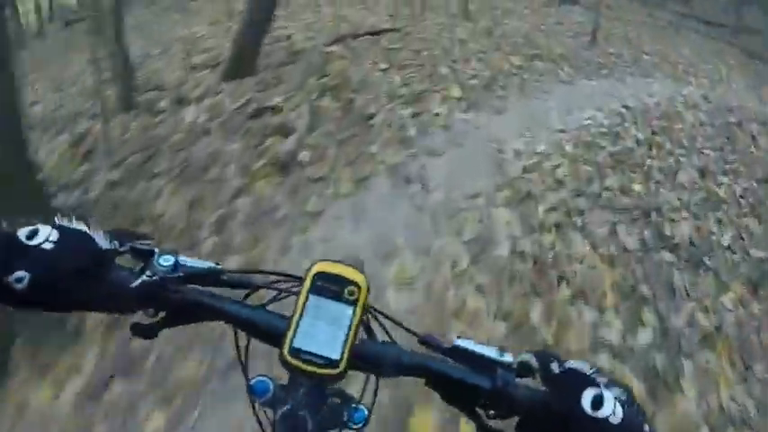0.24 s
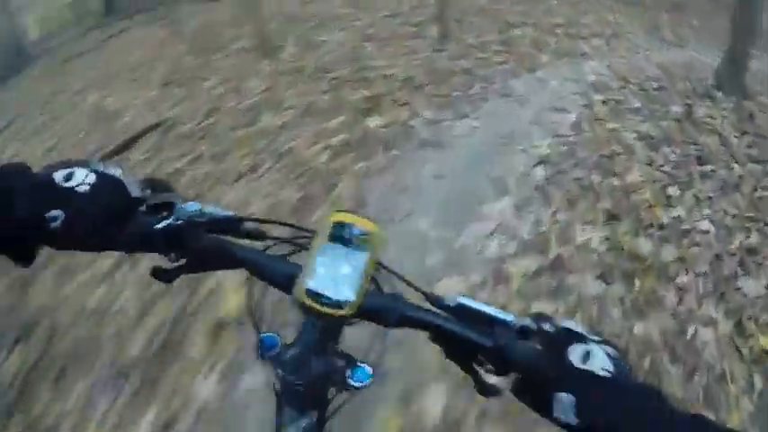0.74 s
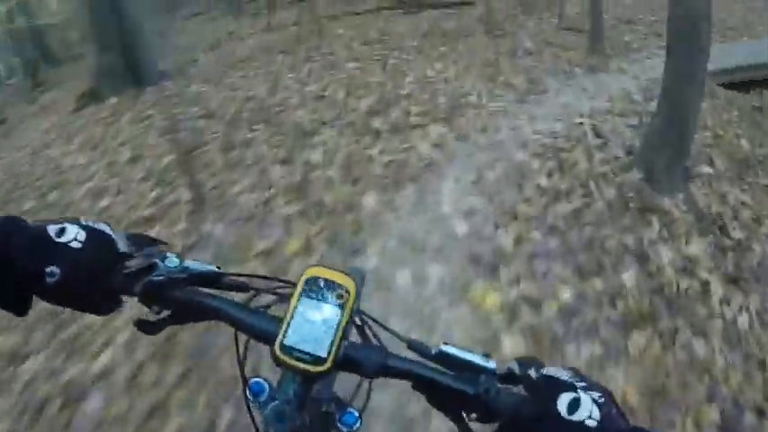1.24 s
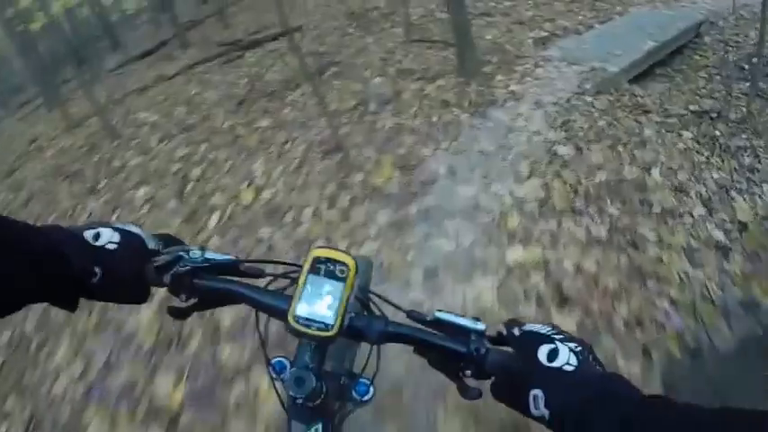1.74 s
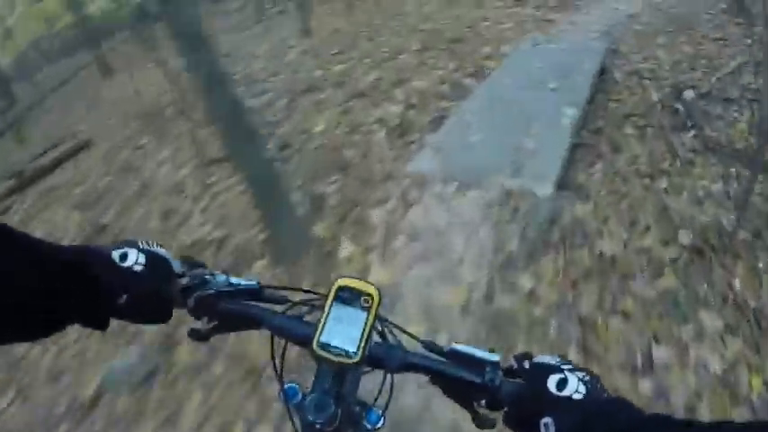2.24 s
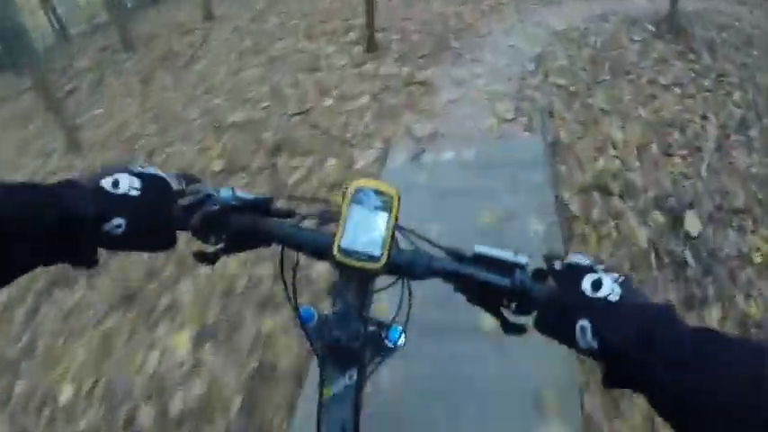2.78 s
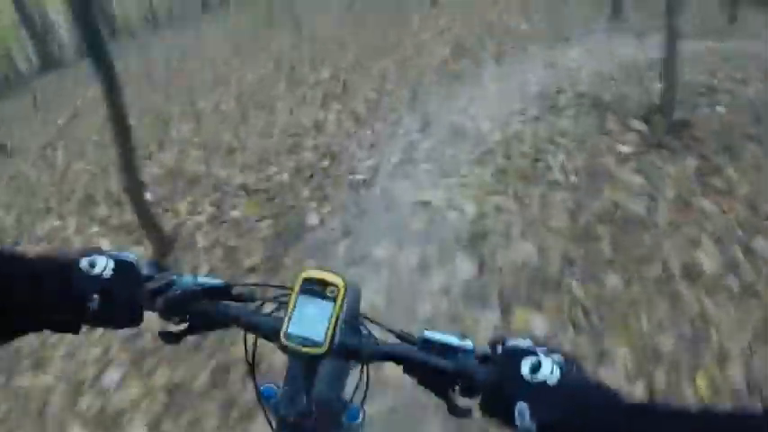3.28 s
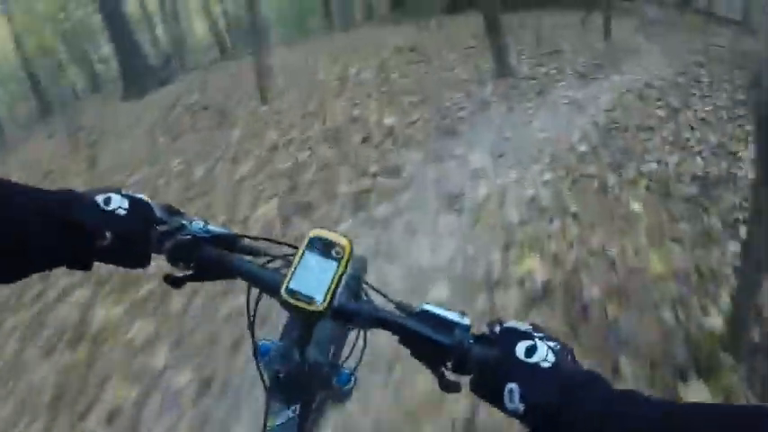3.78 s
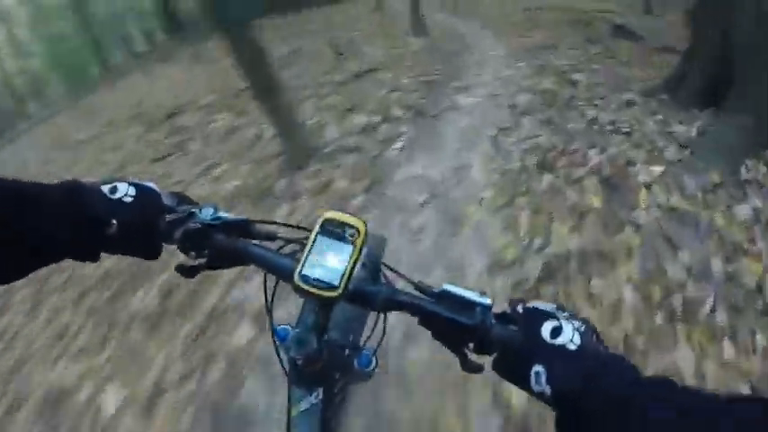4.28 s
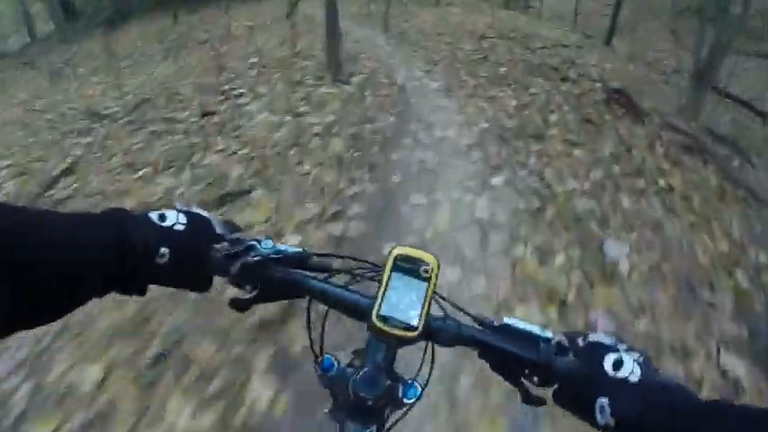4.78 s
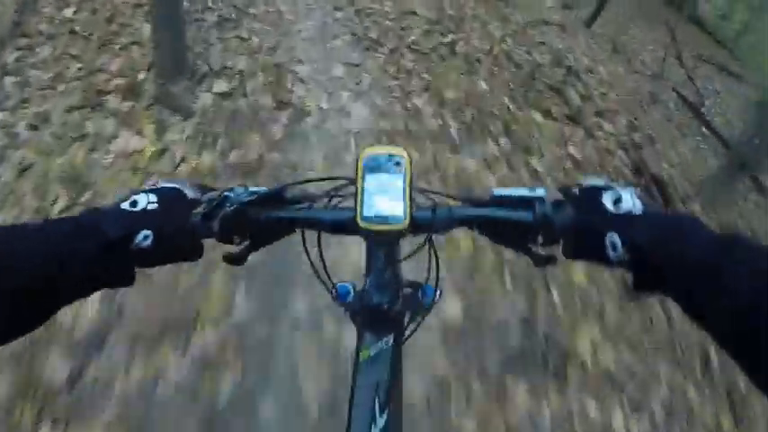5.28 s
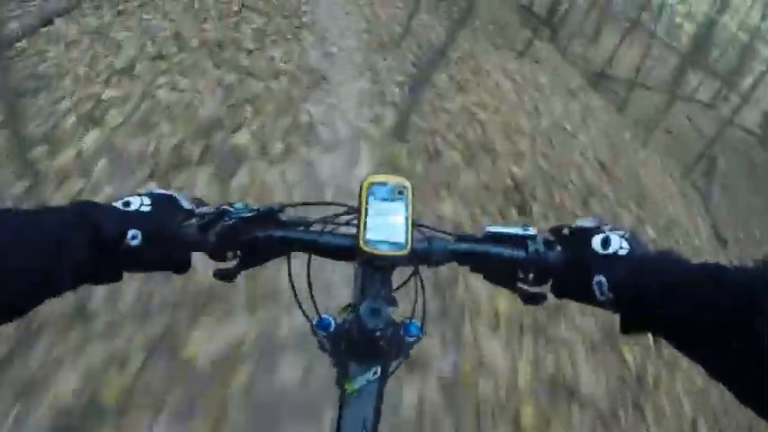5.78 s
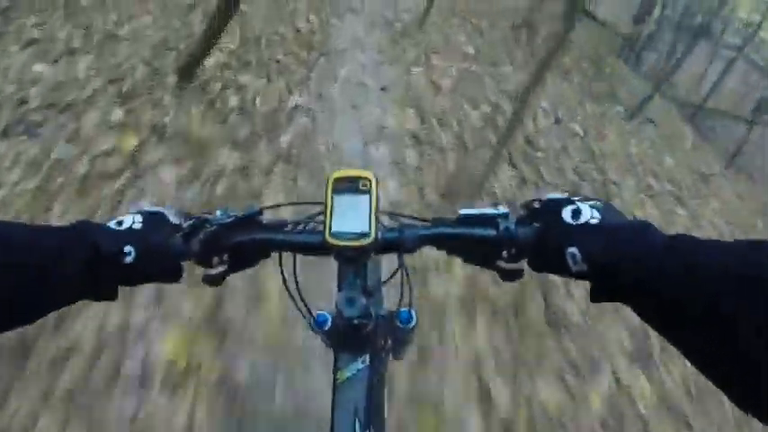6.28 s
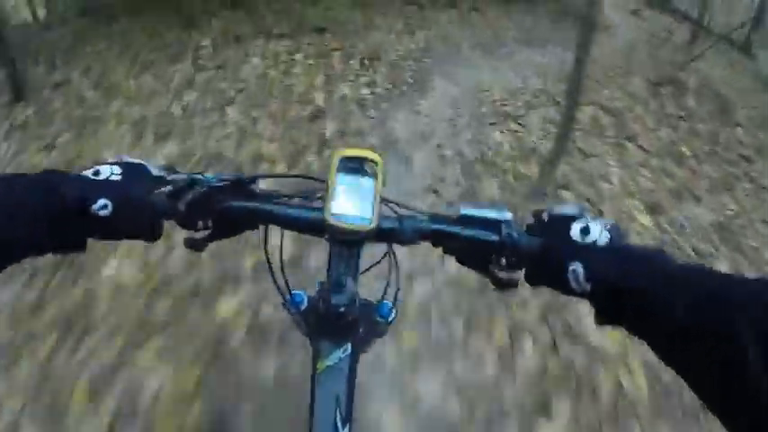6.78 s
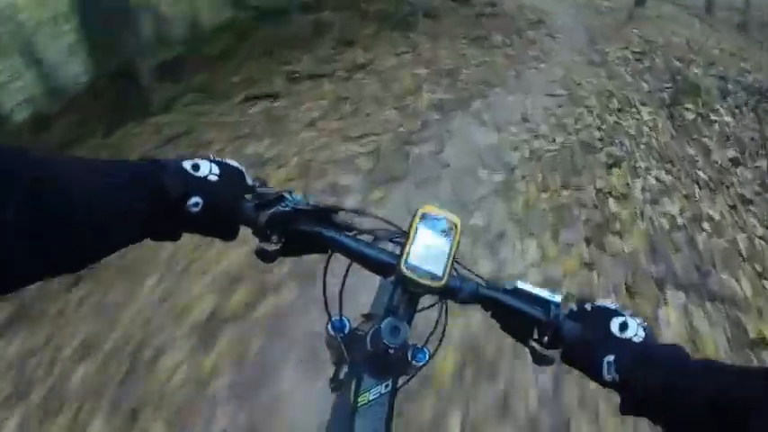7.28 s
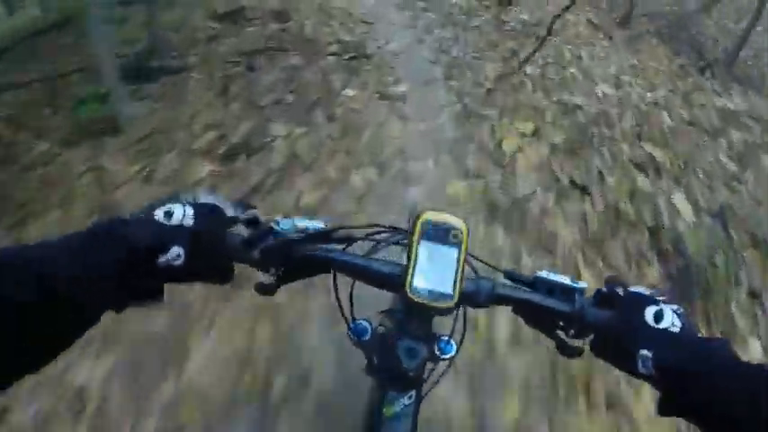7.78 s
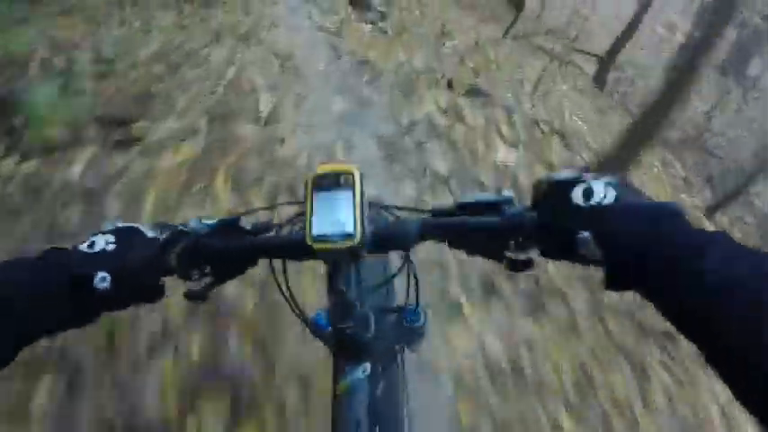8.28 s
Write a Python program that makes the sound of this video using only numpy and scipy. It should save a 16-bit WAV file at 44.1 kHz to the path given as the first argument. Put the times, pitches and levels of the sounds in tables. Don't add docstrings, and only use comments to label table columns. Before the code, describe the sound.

A microphone in a sealed plastic case rides on a cyclist, giving a close, boxy sound. At 0-0.45 s a strap rubs the shell, raps very hard at 0.24 s, scratches brightly and ends with a tiny rising squeak and snap. Until 1.3 s there is mostly soft tyre hiss on dry leaves, with faint ticks. From 1.35 to 2.6 s come irregular sharp clacks and short scrapes. The bike thuds over planks from about 2.65 s, with a huge booming jolt at 3.0 s and more heavy knocks at 3.35 and 3.64 s; low wind flutters and brake hiss is barely present. It calms until a hard clack at 4.6 s and gritty rubbing to 4.95 s. Afterwards steady leaf hiss, faint rapid freewheel clicks, light ticks, crackles and dull low bumps continue, with tiny scrapes near 8.5 s.

```python
import sys
import numpy as np
from scipy import signal
from scipy.fft import rfft, irfft, next_fast_len
from scipy.io import wavfile
from scipy.ndimage import uniform_filter1d

SR = 44100
rng = np.random.default_rng(int(sys.argv[2]) if len(sys.argv) > 2 else 0)


def log_audio(samples):
    frames = np.atleast_2d(samples).T
    limited = np.clip(frames, -1, 1)
    pcm = np.round(limited * 32767).astype(np.int16)
    wavfile.write(sys.argv[1], SR, pcm)


def natural_amplitude(level_db):
    exponent = np.asarray(level_db, float) / 20
    return 10 ** exponent


N = 376173

# t/s, peak level/dB, main ring f/Hz, low shell level/dB, high shell level/dB
KNOCKS = [(0.241, -1.5, 2560, -54, -5.5), (0.55, -25, 1650, -44, -8), (1.3465, -6, 1870, -8, -20),
          (1.545, -26, 4200, -1.5, -4), (1.72, -19.5, 1320, -12.5, -42), (1.842, -25, 2560, -6, -16),
          (1.941, -11.5, 3160, -8, -10), (2.0954, -9, 1350, -14.5, 0), (2.208, -7, 2530, -10, 0),
          (2.248, -15, 1350, -4, -23), (2.406, -9.5, 1420, -9, 6), (2.546, -2, 3500, -24, -1.5),
          (3.001, -8.5, 1920, -9, -46), (3.004, -9, 2180, -11, -42), (3.3624, -6, 2370, -2.5, -44),
          (3.6372, -1.5, 2500, -5.5, -39), (3.686, -11.5, 2640, -10.5, 1), (3.695, -18.5, 2590, -10, -1),
          (4.6059, -2.5, 1536, -25, -5.5), (5.055, -28.5, 4370, -16, -6), (8.451, -24, 4360, -37, -1),
          (8.508, -33, 4520, -17, 6), (8.521, -32, 3150, -20, 10)]
# f/Hz, level/dB
KNOCK_LOW = [(604, -3), (800, -0.5), (1050, 2), (1366, 2), (1720, 2), (2050, -2.5)]
# f/Hz, level/dB, t60/s
BUCKLE = [(568, -41, 0.11), (1350, -34, 0.11), (2880, -35, 0.26), (3480, -41, 0.11), (4100, -45, 0.12)]
# start t/s, end t/s, peak level/dB, place of the peak 0-1, brightness/dB
STROKES = [(-.012, 0.056, -17, 0.31, -6), (0.043, 0.098, -37.5, 0.44, -28), (0.111, 0.14, -44, 0.3, -12),
           (0.166, 0.234, -19.5, 0.7, -7.5), (0.273, 0.3, -36, 0.3, 10), (0.356, 0.401, -25, 0.6, 11.5),
           (0.373, 0.442, -19, 0.92, 10), (1.343, 1.391, -33, 0.05, 10), (1.586, 1.635, -37, 0.37, 3.5),
           (1.73, 1.8, -34, 0.49, 5), (2.094, 2.138, -11.5, 0.34, 6), (2.21, 2.242, -25, 0.36, -15),
           (2.545, 2.596, -16.5, 0.22, -2.5), (2.6, 2.633, -28, 0.47, -0.5), (2.406, 2.424, -26, 0.36, 4),
           (3.716, 3.735, -42.5, 0.3, 0), (3.74, 3.771, -48.5, 0.46, -1), (3.807, 3.832, -54, .5, 4.5),
           (3.297, 3.367, -35.5, 0.8, 12), (3.417, 3.443, -46.5, 0.7, 5), (3.468, 3.49, -46, 0.2, 5),
           (4.643, 4.733, -28.5, 0.37, -9.5), (4.707, 4.765, -18.5, 0.45, -9),
           (4.763, 4.843, -25.5, 0.6, -10.5), (4.811, 4.879, -17, 0.62, 1.5), (4.856, 4.897, -23, 0.56, 3),
           (4.892, 4.947, -15, 0.34, 4), (8.439, 8.464, -36.5, 0.3, 6), (8.508, 8.528, -34.5, 0.8, 6)]
# start t/s, length t/s, level/dB, brightness/dB
SKIDS = [(0.242, 0.005, -3.5, 28), (0.549, 0.017, -35, 7), (1.496, 0.09, -39, 8), (1.548, 0.079, -30.5, 13),
         (1.721, 0.025, -28, 10), (1.84, 0.036, -28.5, -3), (1.943, 0.016, -12.5, 6.5),
         (2.211, 0.029, -9, 7.5), (2.2455, 0.035, -9.5, 2), (2.404, 0.02, -10, -1),
         (3.549, 0.053, -35.5, 13), (4.608, 0.027, -15, -6), (4.683, 0.018, -23, -7),
         (4.7, 0.016, -18, -17), (4.7201, .02, -24, -13), (4.8239, 0.013, -14.5, -14),
         (4.8384, .015, -13, -11), (4.688, 0.045, -24, -5), (4.785, 0.017, -18, -13)]
# t/s, then level/dB over the 2.5 kHz modes of the
# 3 kHz, 4.5 kHz, 6 kHz and top modes
EDGE = [(0, 0, -8, -5.5, -19), (.1, 4, -6, -5, -22), (.235, -8, -11, -14, -47), (.35, -9.5, -13, -21, -29),
        (0.408, -9, -5.5, -9, -15), (.431, -3, -14, 0, -7), (1.343, -8, -0.5, -6, -22.5),
        (1.7, -7, -7, -11, -19), (1.93, 1, -2, -4, -18.5), (2.09, 2, -8.5, -5, -18.5),
        (2.2, 2, -8, -6, -17), (2.239, -3.5, -19, -10.5, -46), (2.4, 4, -14, -9.5, -35),
        (2.539, 5.5, -3, -5, -14), (2.6, 0, -2, -4.5, -18), (3.2, -8, -8, -12, -22),
        (4.599, -4, -3, 0, -25), (4.64, -7, -9, -2, -27), (4.762, 1, -15, -3, -29),
        (4.82, -0.5, -2, 1, -21), (4.885, 0, -2.5, -10, -23), (5, -4, -6, -4, -20)]
# f/Hz, width f/Hz, level/dB
SHELL_DEEP = [(607, 110, -1.5), (890, 80, -1)]
SHELL_LOW = [(1344, 117, 14), (1770, 1000, 0.5), (1100, 400, 2)]
SHELL_MIDDLE = [(2390, 810, 2.5), (2530, 265, 10.5), (2995, 100, -2), (3546, 290, -3.5)]
SHELL_UPPER = [(4300, 310, 11), (4810, 500, 3.1), (5600, 770, 3.9), (6020, 470, 6.2), (6670, 1000, 2.4)]
SHELL_TOP = [(7530, 500, -2), (8560, 500, -2.5), (9240, 1260, -6), (10480, 590, -10), (11700, 900, -13),
             (13000, 740, -20), (14100, 500, -16), (15300, 800, -30)]
# start t/s, end t/s, from f/Hz, to f/Hz, level/dB
SQUEAK = (.4195, .431, 2800, 4850, -17)
# t/s, peak level/dB, ring f/Hz
SNAPS = [(0.3731, -21, 2600), (0.4193, -8.5, 2800), (0.4334, -14, 2300), (1.4957, -36, 1410),
         (1.585, -22, 2300), (1.6026, -22, 2350), (1.6097, -21, 2240), (1.7706, -18, 2500),
         (1.792, -26, 2520), (1.8272, -30, 2530), (1.8617, -28, 1350), (3.7199, -39, 1320),
         (4.656, -21, 1440), (4.682, -22, 1430), (4.6904, -21, 1290), (4.7034, -15, 1390),
         (4.7898, -20, 1380), (4.8387, -9, 1320), (4.8762, -16, 1320)]
# t/s, peak level/dB, ring f/Hz
TICKS = [(0.6193, -32, 2450), (0.756, -34, 4050), (0.8515, -28.5, 2300), (0.883, -32, 2180),
         (5.4, -33, 2280), (5.7235, -31.5, 4400), (6.571, -35, 2550), (6.73, -32, 2490),
         (6.8627, -32, 2540), (7.062, -30, 2490), (7.1903, -31, 1980), (7.253, -30, 2630),
         (7.362, -35, 2500), (7.439, -33, 2800), (7.6818, -28, 3530), (7.822, -29, 2540),
         (7.895, -35, 2630), (7.962, -31.5, 2480), (8.009, -29, 2620), (8.079, -30.5, 2530),
         (8.157, -31, 2000), (8.325, -29, 2620)]
# t/s, peak level/dB, f/Hz, buzz level over the peak/dB
BUMPS = [(0.432, -30, 107, -10), (1.117, -26, 106, -18), (1.347, -24.5, 195, -3), (1.497, -31, 78, -31),
         (1.754, -27, 143, -15), (1.981, -29, 98.5, -39), (2.16, -18, 113.7, -20), (4.029, -35, 117, -22),
         (4.875, -31, 107, -11), (4.974, -27, 118, -35), (5.03, -26.5, 176, -4), (5.302, -51, 114, 0),
         (5.688, -32.5, 175, -16), (5.9, -29.5, 118, -28), (6.001, -34.5, 181, -18), (6.229, -39, 105, -22),
         (6.621, -32, 115, -15), (6.98, -30.5, 160, -14), (7.076, -24, 104, -22), (7.222, -29, 122, -9),
         (7.653, -22, 119, -16), (8.143, -31, 140, -18), (8.155, -26.5, 154, -10), (5.914, -36, 139, -3),
         (8.216, -34, 131, -12), (8.394, -28.5, 124, -13)]
# t/s, peak level/dB, f/Hz, buzz level over the peak/dB
PLANKS = [(2.659, -21.5, 130, -17.5), (2.688, -25.5, 114, -20), (2.944, -22.5, 61.6, -46),
          (2.982, -22.5, 150, -11), (3.002, -3.5, 135, -18), (3.05, -24, 118, -38),
          (3.098, -28.5, 236, -12), (3.314, -23, 146, -16), (3.342, -15.5, 102, -11),
          (3.362, -12.5, 90, -5), (3.418, -43.5, 72.7, 6.5), (3.433, -36.5, 195, 4), (3.112, -34, 197, -1),
          (3.299, -28.5, 147, -6), (3.464, -33, 118, -8.5), (3.601, -26, 61.9, -20),
          (3.637, -15.5, 62.3, -9.5)]
# f/Hz, width f/Hz, level/dB
MOUNT_LOW = [(66.4, 82, -5), (118, 14.6, 6), (168.4, 38, -4), (248, 250, -26.5)]
MOUNT_BUZZ = [(423, 51, 4), (603, 12, -2.5), (885, 980, -9.5)]
# t/s, level/dB
GUST = [(0.0, -45), (0.14, -34), (1.4, -34), (2.04, -25.5), (2.63, -29.5), (2.73, -25.5), (3.06, -32.5),
        (3.11, -19), (3.21, -39), (3.32, -28.5), (3.63, -22), (3.75, -43), (5.18, -29), (5.25, -38),
        (6.46, -29), (8.17, -31.5), (8.32, -25.5), (8.53, -31.5)]
# t/s, level/dB
GROUND = [(0.0, -46), (0.28, -55), (0.9, -44), (1.61, -47), (2.02, -44), (2.26, -46.5), (2.49, -51),
          (3.16, -43), (3.51, -37.5), (3.71, -59), (3.99, -52.5), (4.16, -50.5), (5.49, -43.5), (5.89, -50),
          (7.58, -44.5), (8.0, -47.5), (8.41, -47), (8.53, -36.5)]
# t/s, level/dB
LEAVES = [(0, -50.5), (.3, -50), (2.23, -49.5), (2.5, -51.5), (2.95, -48), (3.3, -45), (3.62, -48),
          (3.8, -60), (4.01, -58.5), (4.6, -49), (5.1, -50.5), (5.45, -48.5), (6.06, -52), (6.25, -46),
          (6.6, -52.5), (6.9, -49), (8.05, -50), (8.53, -44.5)]
# f/Hz, level per Hz/dB
TYRES = [(410, -17.5), (700, -3.5), (1150, -12.5), (1300, -0.5), (1430, -7), (1560, -1.5), (2490, 0),
         (3870, -8), (4350, -5.5), (5150, -11), (6180, -15), (6850, -20), (12600, -32), (14000, -41),
         (15500, -52)]
# f/Hz, width f/Hz, level/dB
TYRE_RING = [(2530, 47, -9.5), (3530, 106, -2), (4325, 140, -10), (6150, 520, -1)]
# t/s, peak level/dB, ring f/Hz
CRACKLES = [(5.3138, -54, 5760), (5.3992, -43, 5900), (5.4266, -47, 6300), (5.7209, -46, 6100),
            (6.2607, -42, 6350), (6.6134, -51, 6160), (6.7391, -38, 6130), (6.781, -38, 6090),
            (6.8199, -39, 5680), (6.8658, -44, 6140), (7.0669, -45, 6090), (7.0878, -40, 5840),
            (7.1651, -49, 6130), (7.3816, -46, 5790), (7.4365, -47, 5920), (7.5148, -42, 6040),
            (7.6001, -51, 6280), (7.6431, -48, 6020), (7.685, -35, 6150), (7.7239, -39, 6190),
            (7.7468, -36, 6200), (7.9149, -54, 5840), (8.0072, -36, 6200), (8.2247, -46, 5770),
            (8.2601, -46, 5920), (8.3006, -48, 5700), (8.323, -46, 5700), (8.3744, -45, 5630)]
# t/s, click rate f/Hz, level over the tyre hiss/dB
FREEWHEEL = [(0, 45, -23), (3.6, 45, -30), (5.2, 46, -26.5), (6.701, 49, -21.5), (7.05, 43, -23.5),
             (7.451, 49.5, -23), (7.9, 45.5, -22), (8.53, 48, -25)]
# t/s, level/dB
BRAKE = [
    (3.05, -79),
    (3.2, -53),
    (3.36, -50),
    (3.5, -72),
    (3.62, -78),
]
# f/Hz, width f/Hz, level/dB
PADS = [(4550, 370, -8), (5540, 320, -6)]
# start t/s, depth level/dB, recovery t/s
DUCK = (3.3, -2, 0.24)
# f/Hz, width f/Hz, depth 0-1
CASE_GAPS = [(4940, 133, 0.5), (8860, 400, 0.56), (13800, 300, .45)]

KNOCK_T60_S, CRACK_DB, CRACK_DULLING = 0.012, 0.5, 0.047
KNOCK_UPPER_DB, KNOCK_TOP_DB = -7, -4.5
ARCH_DB, LIFT_DB, LAND_DB, SKID_FALL_DB = 39.5, 17, 12.5, 30.5
DEEP_DB = -21.5
EVENNESS, EVEN_S = 0.38, 0.012
BUMP_T60_S, PLANK_T60_S, DAMPING = 0.072, 0.082, 0.22
HEAVE_HZ, HEAVE_WIDTH_HZ, HEAVE_TAIL_DB = 12.52, 0.62, -9.5
RUMBLE_DB, BUZZ_DB, BUZZ_FOLLOWS, HISS_DB = 2, -57, 0.82, 2
SHAKE_LEAD_S, SHAKE_S, SHAKE_FROM_DB = 0.0078, 0.019, -46.5
SHAKE_RUMBLE, SHAKE_BUZZ, SHAKE_HISS = 0.51, 0.22, 0.11
LIMIT_DB, LIMIT_S = -13.5, 0.039
CUTOFF_HZ = 16300


def knocks():
    out, t = np.zeros(N), np.arange(int(0.03 * SR)) / SR
    t60 = KNOCK_T60_S
    for s, db, hz, low_db, high_db in KNOCKS:
        low_luck, upper_luck, top_luck, sing_luck = rng.normal(0, 2, (4, 6))
        low = high = sing = 0
        for k, ((mode_hz, mode_db), luck) in enumerate(zip(KNOCK_LOW, low_luck)):
            low = low + (-1) ** k * natural_amplitude(mode_db + luck) * decaying(mode_hz, t60 * 0.64, rise=0.00025)
        for (mode_hz, _, mode_db), luck in zip(SHELL_UPPER[1:] + SHELL_TOP, [*upper_luck, *top_luck]):
            group_db = KNOCK_TOP_DB if mode_hz > SHELL_UPPER[-1][0] else KNOCK_UPPER_DB
            high = high + natural_amplitude(mode_db + luck + group_db) * decaying(mode_hz, t60 * 0.27, rise=0.0001)
        for (mode_hz, mode_db, ring_s), luck in zip(BUCKLE, sing_luck):
            level_db = mode_db + luck + 0.3 * high_db + 0.72 * db
            sing = sing + natural_amplitude(level_db) * decaying(mode_hz, ring_s, rise=0.0014)
        ring = decaying(hz, t60, rise=0.00015) + natural_amplitude(low_db) * low + natural_amplitude(high_db) * high + sing
        add(out, s + 0.00054, natural_amplitude(db) * ring)
        burst = rng.standard_normal(len(t)) * natural_amplitude(-60 * t / (t60 * 1.1))
        crack = band(burst, hz * 0.45, hz * 1.25, order=3)
        add(out, s + 0.000698, natural_amplitude(db + CRACK_DB + CRACK_DULLING * high_db) * crack)
    return out


def rubs():
    slips = rng.standard_normal((4, N)) + 0.21 * grains(2400, 7.1)
    slips *= natural_amplitude(1.5 * drift(90))
    press, bright_db = strap()
    since, *edge_db = np.transpose(EDGE)
    row = np.clip(np.searchsorted(since, np.arange(N) / SR) - 1, 0, None)
    low_share = 1 / (1 + natural_amplitude(2 * bright_db))
    edge = natural_amplitude(edge_db)[:, row]
    middle = np.sqrt((1 - low_share) / (1 + np.sum(edge ** 2, axis=0)))
    gains = [np.sqrt(low_share), middle, *(middle * edge), middle * natural_amplitude(DEEP_DB)]
    groups = [(SHELL_LOW, 1050, 2300), (SHELL_MIDDLE[:2], 1900, 2900), (SHELL_MIDDLE[2:], 2750, 3900),
              (SHELL_UPPER[:2], 3900, 5200), (SHELL_UPPER[2:], 5000, 6750), (SHELL_TOP, 7000, 15300),
              (SHELL_DEEP, 450, 1050)]
    out = 0
    for slip, gain, (modes, low_hz, high_hz) in zip([*slips, *slips[1:]], gains, groups):
        steady = band(resonate(slip, modes), low_hz, high_hz, order=5)
        played = band(resonate(slip * gain * press, modes), low_hz, high_hz, order=5)
        swing = uniform_filter1d(steady ** 2, round(EVEN_S * SR)) / np.var(steady) + 0.05
        out = out + played * swing ** (-EVENNESS / 2) / np.std(steady)
    return out


def strap():
    press, bright = np.full(N, 1e-9), np.zeros(N)
    rows = [(*stroke, False) for stroke in STROKES]
    rows += [(start, start + length, db, 0, bright_db, True) for start, length, db, bright_db in SKIDS]
    for start, end, db, place, bright_db, skid in rows:
        i, j = max(round(start * SR), 0), min(round(end * SR), N)
        u = (np.arange(i, j) / SR - start) / (end - start)
        if skid:
            loss_db = SKID_FALL_DB * u
        else:
            loss_db = ARCH_DB * (np.clip(u, 1 / 8, 7 / 8) - place) ** 2
            loss_db = loss_db + LIFT_DB * np.maximum(8 * u - 7, 0) + LAND_DB * np.maximum(1 - 6 * u, 0)
        shape = natural_amplitude(db - loss_db)
        bright[i:j] = np.where(shape > press[i:j], bright_db, bright[i:j])
        press[i:j] = np.maximum(press[i:j], shape)
    return press, bright


def squeak():
    start, end, from_hz, to_hz, db = SQUEAK
    out, u = np.zeros(N), np.linspace(0, 1, round((end - start) * SR))
    phase = 2 * np.pi * np.cumsum(from_hz + (to_hz - from_hz) * u) / SR
    add(out, start, natural_amplitude(db) * np.sin(np.pi * u ** 2.3) * np.sin(phase))
    return out


def ticks():
    out = np.zeros(N)
    edge = sum(natural_amplitude(db - 15) * decaying(hz, 0.0047, rise=0.0001) for hz, _, db in SHELL_UPPER[::2])
    for s, db, hz in TICKS + SNAPS:
        add(out, s, natural_amplitude(db + 1) * (decaying(hz, 0.01, rise=0.00056) + edge))
    return out


def bumps():
    out, t = np.zeros(N), np.arange(int(0.019 * SR)) / SR
    grit = rms_one(band(rng.standard_normal(N), 330, 1850, order=2))
    jolts = [(*row, BUMP_T60_S) for row in BUMPS] + [(*row, PLANK_T60_S) for row in PLANKS]
    for s, db, hz, buzz_db, ring_s in jolts:
        t60 = ring_s * natural_amplitude(-DAMPING * (db + 28))
        buzz = sum(natural_amplitude(d) * decaying(h, t60 * 0.4, rise=0.00054) for h, _, d in MOUNT_BUZZ)
        add(out, s, natural_amplitude(db + 7.5) * (decaying(hz, t60, rise=0.0019) + natural_amplitude(buzz_db) * buzz))
        puff = grit[round(s * SR):][:len(t)] * (t / 0.008) * np.exp(-t / 0.008)
        add(out, s, natural_amplitude(db + buzz_db - 5) * puff)
    return out


def wind(db):
    white = rng.standard_normal((2, N + SR))
    heave = resonate(white[0], [(HEAVE_HZ, HEAVE_WIDTH_HZ, 0)])[SR:]
    lumps = band(white[1], 21.1, 38.6, order=2)[SR:]
    return natural_amplitude(db) * (rms_one(heave) + natural_amplitude(HEAVE_TAIL_DB + 1.2 * drift(1.7)) * rms_one(lumps))


def mount(rumble_db, buzz_db):
    rough_db = 1.2 * drift(14)
    low = resonate(grains(300, 3.5) * natural_amplitude(rough_db), MOUNT_LOW)
    buzz = resonate(grains(500, 2.2) * natural_amplitude(rough_db + 5.4 * drift(23)), MOUNT_BUZZ)
    rumble = natural_amplitude(rumble_db + 2) * rms_one(band(low, 31, 325, order=2))
    return rumble + natural_amplitude(buzz_db + 1) * rms_one(band(buzz, 220, 1000, order=2))


def shake():
    t, power = np.arange(0, N, 20) / SR, 1
    for s, db, _, _ in BUMPS + PLANKS:
        away = np.maximum((s - t) / SHAKE_LEAD_S, (t - s) / SHAKE_S)
        power = power + natural_amplitude(2 * (db - SHAKE_FROM_DB)) * np.exp(-2 * away)
    return np.repeat(10 * np.log10(power), 20)[:N]


def tyres(db):
    hz, level_db = np.transpose(TYRES)
    out, common_db = 0, 1.64 * drift(40) + 1.44 * drift(6)
    edges = np.geomspace(450, 16000, 15)
    crackle = [rng.standard_normal(N) + 0.7 * grains(400, 5.5) for _ in range(2)]
    for k, (low_hz, high_hz) in enumerate(zip(edges, edges[1:])):
        flicker = natural_amplitude(common_db + 1.6 * drift(17.5))
        out = out + flicker * band(crackle[k % 2], low_hz, high_hz, order=2)
    size = next_fast_len(N)
    grid_hz = np.arange(1, size // 2 + 2) * SR / size
    colour = natural_amplitude(np.interp(np.log(grid_hz), np.log(hz), level_db))
    out = irfft(rfft(out, size) * colour, size)[:N]
    ring = sum(resonate(out, [mode]) for mode in TYRE_RING)
    return natural_amplitude(db - 2.5) * rms_one(out + ring)


def crackles():
    out = np.zeros(N)
    for s, db, hz in CRACKLES:
        pair = decaying(hz, 0.019, rise=0.0004) + decaying(hz * 1.2, 0.0047, rise=0.00051)
        add(out, s, natural_amplitude(db - 2.5) * pair)
    return out


def freewheel(hiss_db):
    s, per_s, db = np.transpose(FREEWHEEL)
    t = np.arange(N) / SR
    rate = np.interp(t, s, per_s)
    since = np.cumsum(rate / SR) % 1 / rate
    bursts = rng.standard_normal(N) * np.exp(-since / 0.0067) * natural_amplitude(1.7 * drift(22))
    bright = band(resonate(bursts, SHELL_TOP), 5700, 14500, order=2)
    return natural_amplitude(hiss_db + np.interp(t, s, db)) * rms_one(bright)


def brake():
    s, db = np.transpose(BRAKE)
    hiss = resonate(resonate(rng.standard_normal(N), PADS), PADS)
    return natural_amplitude(np.interp(np.arange(N) / SR, s, db, left=-120, right=-120)) * rms_one(hiss)


def ducking():
    t = np.arange(0, N, 20) / SR
    dips = [DUCK] + [(s, -max(db - LIMIT_DB, 0), LIMIT_S) for s, db, *_ in KNOCKS]
    db = sum(depth * (t > s) * np.exp(-np.abs(t - s) / recovery) for s, depth, recovery in dips)
    return np.interp(np.arange(N) / SR, t, natural_amplitude(db))


def resonate(x, modes):
    out = 0
    for k, (hz, width_hz, db) in enumerate(modes):
        r = np.exp(-np.pi * width_hz / SR)
        a = [1, -2 * r * np.cos(2 * np.pi * hz / SR), r * r]
        out = out + (-1) ** k * natural_amplitude(db) * signal.lfilter([(1 - r * r) / 2, 0, (r * r - 1) / 2], a, x)
    return out


def decaying(hz, t60, rise):
    t = np.arange(int(0.2 * SR)) / SR
    return -np.sin(2 * np.pi * hz * t) * natural_amplitude(-60 * t / max(t60, 0.003)) * (1 - np.exp(-t / rise)) ** 2


def grains(per_s, spread_db):
    sizes = natural_amplitude(spread_db * np.minimum(rng.exponential(1, N), 4)) * rng.choice([-1, 1], N)
    return sizes * (rng.random(N) < per_s / SR) + 1e-18


def drift(rate):
    r = np.exp(-80 * np.pi * rate / SR)
    slow = signal.lfilter([1], [1, -2 * r, r * r], rng.standard_normal(N // 40 + 2002))[2000:]
    return np.interp(np.arange(N) / 40, np.arange(len(slow)), rms_one(slow - slow.mean()))


def band(x, low_hz, high_hz, order):
    return signal.sosfilt(signal.butter(order, [low_hz, high_hz], "band", fs=SR, output="sos"), x)


def rms_one(x):
    return x / np.sqrt(np.mean(x ** 2) + 1e-20)


def curve(rows):
    return np.interp(np.arange(N) / SR, *np.transpose(rows))


def add(out, s, x):
    i = round(s * SR)
    out[i:i + len(x)] += x[:N - i]


def scene():
    rough, jolt = curve(GROUND), shake()
    rumble_db = rough + RUMBLE_DB + SHAKE_RUMBLE * jolt
    buzz_db = BUZZ_DB + BUZZ_FOLLOWS * (rough - rough.mean()) + SHAKE_BUZZ * jolt
    hiss_db = curve(LEAVES) + HISS_DB + SHAKE_HISS * jolt
    steady = wind(curve(GUST)) + mount(rumble_db, buzz_db) + tyres(hiss_db) + freewheel(hiss_db) + brake()
    struck = knocks() + rubs() + squeak() + ticks() + bumps() + crackles()
    return (struck + ducking() * steady)[None]


def top_cut(x):
    return signal.sosfilt(signal.butter(12, 15880, fs=SR, output="sos"), x)


def record(dry):
    gaps = sum(depth * resonate(dry, [(hz, width_hz, 0)]) for hz, width_hz, depth in CASE_GAPS)
    low_pass = signal.cheby2(8, 50, CUTOFF_HZ, fs=SR, output="sos")
    mix = signal.sosfilt(low_pass, np.clip(dry - gaps, -1, 1))
    return top_cut(np.clip(mix, -1, 1))


dry = scene()
out = record(dry)
log_audio(out)
```